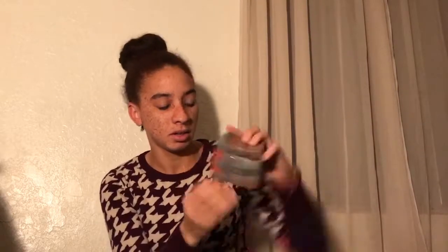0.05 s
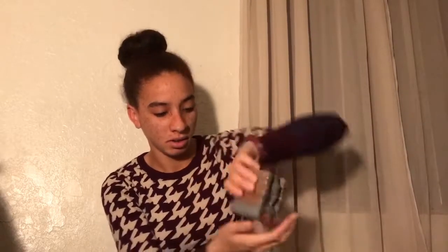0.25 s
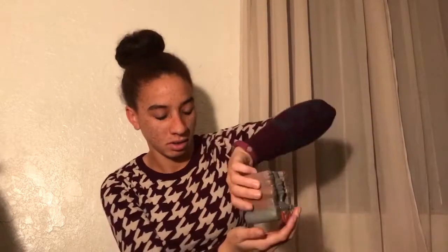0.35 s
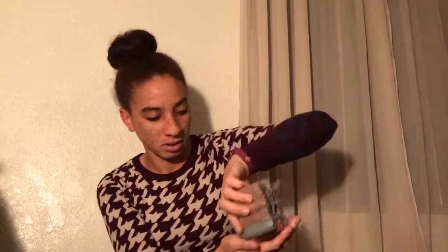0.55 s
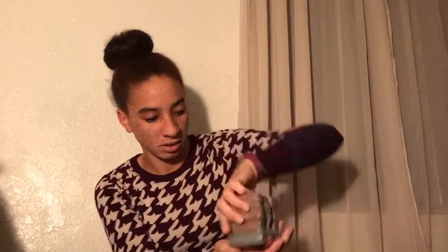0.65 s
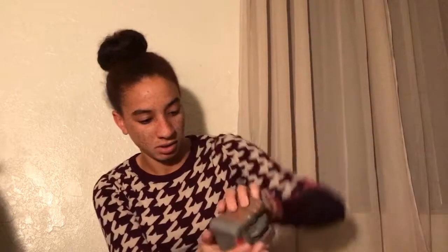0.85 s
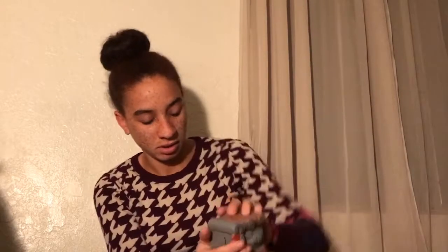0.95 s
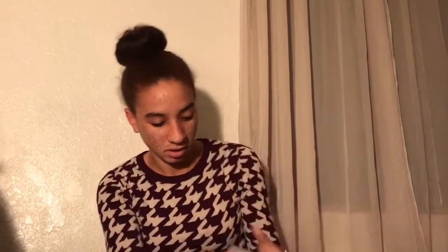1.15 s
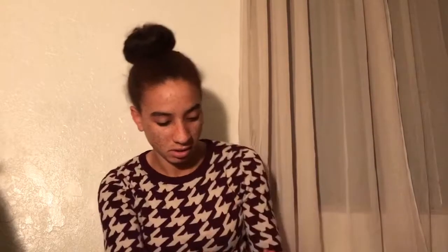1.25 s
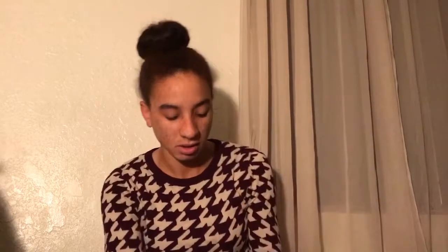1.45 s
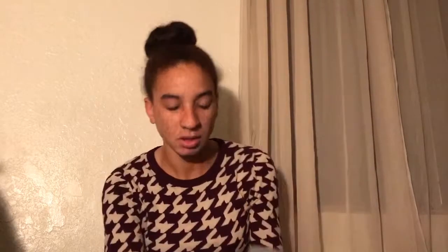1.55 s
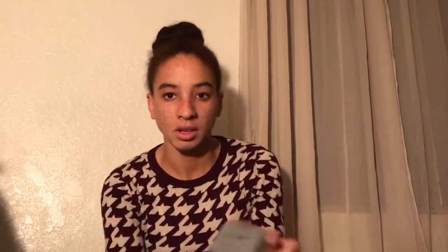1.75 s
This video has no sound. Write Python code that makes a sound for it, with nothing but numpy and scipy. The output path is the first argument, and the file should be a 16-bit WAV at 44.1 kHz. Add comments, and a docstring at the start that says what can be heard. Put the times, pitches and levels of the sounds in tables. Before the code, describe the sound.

A coin tumbles inside a hollow plastic coin bank turned in the hands, with sharp bright clacks first, then weaker clusters of clicks, heard about a metre away in a small furnished room with faint hum.

```python
"""Quiet hum and hiss come first, then a burst of clicks and rattles that comes and goes.
A coin tumbles in a hollow plastic coin bank turned over in the hands, a metre from a laptop microphone.
Each contact clicks, crackles and rings the short modes of the shell; sliding adds faint ticks.
Free coin pings, cavity booms and soft palm knocks join in as decaying tones.
Near surfaces give a few echoes, and filtered noise makes the fast fade of a small furnished room."""
import sys
import numpy as np
from scipy import signal
from scipy.fft import rfft, irfft
from scipy.io import wavfile

SR = 44100
rng = np.random.default_rng(int(sys.argv[2]) if len(sys.argv) > 2 else 0)


def gain_from_decibels(decibels):
    """Convert decibel values to linear amplitude factors."""
    exponent = np.asarray(decibels, float) / 20
    return 10 ** exponent


def dump_mix(stems):
    """Bounce the given channels to the path in sys.argv[1] as a 16-bit WAV at rate SR."""
    frames = np.atleast_2d(stems).T  # one column per channel
    limited = np.clip(frames, -1, 1)  # hard clip at full scale
    pcm = np.round(limited * 32767).astype(np.int16)
    wavfile.write(sys.argv[1], SR, pcm)


N = 79380  # samples, 1.8 s

# Steady background spectrum, before its overall level is set: pitch_hz, level_db
FLOOR_SPECTRUM = [(18, -21.5), (30, -9.5), (45, -5.5), (62, -0.5), (85, -6), (130, -10.5), (270, -14),
                  (900, -21.5), (1500, -21), (2500, -28), (6200, -33), (8800, -32.5), (10500, -31.5),
                  (15600, -28), (16200, -47.5)]
# Early echoes from the nearest surfaces: delay_s, level_db
ECHOES = [(.0078, -16), (.009, -14), (.0102, -14), (.0124, -17)]
# Room tail by pitch: pitch_hz, time_to_fade_60_db_s, level_db
ROOM_TAIL = [(985, 0.2, -8.5), (2170, 0.14, -7), (3480, 0.22, -12.5), (5500, 0.21, -11.5),
             (8650, 0.12, -12.5), (13000, .1, -7)]
# Loudness path of the coin sliding and ticking between contacts: time_s, level_db
SLIDE_LEVELS = [(0, -87), (.09, -74.5), (0.169, -72.5), (.3, -79), (0.501, -72), (.7, -89.5), (.86, -76.5),
                (0.951, -54), (1.03, -82), (1.11, -74.5), (1.2, -103), (1.28, -69), (1.4, -70),
                (1.5, -73.5), (1.6, -64), (1.68, -69), (1.74, -65), (1.8, -58)]
# Soft knocks of the shell against a palm: start_s, level_db
PALM_KNOCKS = [(.234, -47.5), (0.327, -49.5), (1.5417, -46)]
# Shell tones in a palm knock: pitch_hz, level_db, time_to_fade_60_db_s
KNOCK_MODES = [(328, -3, 0.039), (1090, -2, .015)]
# Flat landings that also boom the cavity: start_s, level_db
CAVITY_BOOMS = [(0.126, -56.5), (0.213, -52.5), (0.231, -49), (0.337, -52.5), (0.375, -51.5), (0.404, -47),
                (0.456, -49.5), (0.601, -46.5), (0.921, -52), (0.956, -54), (1.289, -50), (1.62, -57)]
# Cavity tones: pitch_hz, level_db, time_to_fade_60_db_s
CAVITY_MODES = [(882, -2, 0.02076), (1076, -2.5, 0.023), (1297, 0.5, .02)]
# Contacts that leave the coin free to ring until it touches again: start_s, level_db, length_s
COIN_PINGS = [(.2322, -62, .06), (.3204, -56, .016), (.4304, -68, .03), (.6012, -68, .012)]
# Coin tones: pitch_hz, level_db, time_to_fade_60_db_s
COIN_MODES = [(12120, 0, .2), (12740, 4, .15), (14770, -8.5, .1)]
# Shell tones in five groups, low to top: pitch_hz, level_db, time_to_fade_60_db_s
LOW_MODES = [(1742, -19.5, .012), (1994, -10.5, .012), (2162, 1, 0.023), (2352, -1.5, 0.038),
             (2478, -1.5, 0.017)]
BODY_MODES = [(2792, -8.5, 0.012), (3170, -2.5, 0.014), (3233, 0, 0.024), (3330, -12, .01)]
MIDDLE_MODES = [(3710, -3, 0.005), (3904, 0, .012), (4380, 1, .01), (4405, 0, 0.01265), (4767, -12, 0.014)]
HIGH_MODES = [(4722, -8, .01), (5510, 1, 0.014), (6210, -2, 0.013), (6395, -12, 0.01), (6620, -7.5, .008),
              (7095, -1, .008), (7600, -11.5, 0.0044)]
TOP_MODES = [(8500, -0.5, .005), (9010, -5, .005), (10860, -16.5, .004), (12330, -14.5, .005),
             (14200, -17, 0.0037)]
# Unpitched crack of each group, its level set against the tones: low_hz, high_hz, crack_db, decay_s
CRACK_BANDS = [(1720, 3020, -1, 0.0013), (2690, 4180, -5.5, 0.0017), (3800, 4400, -2, 0.00048),
               (5270, 6800, 1, 0.00073), (7700, 10500, -1, 0.00037)]
# Coin contacts: start_s, low_db, body_db, middle_db, high_db, top_db, chatter_ms
CONTACTS = [(0.1139, -70, -71, -70, -60, -67, 1.1), (0.1259, -48, -48, -53, -53, -64, 2.2),
            (0.1912, -84, -71, -72, -66, -79, 1.0), (0.2048, -46, -45, -52, -47, -49, 1.3),
            (0.2144, -27, -21, -26, -18, -25, 1.0), (0.2209, -33, -24, -31, -23, -30, 0.9),
            (0.2269, -55, -45, -44, -41, -53, 1.5), (0.2322, -50, -37, -35, -22, -24, 0.7),
            (0.2923, -58, -51, -52, -60, -61, 1.7), (0.3204, -31, -24, -24, -21, -25, 0.9),
            (0.3382, -44, -34, -36, -35, -42, 2.2), (0.341, -43, -39, -52, -48, -39, 2.2),
            (0.3577, -42, -42, -41, -28, -40, 2.2), (0.3762, -40, -47, -60, -46, -62, 2.2),
            (0.4048, -35, -39, -38, -32, -39, 2.2), (0.4304, -46, -43, -42, -40, -54, 2.1),
            (0.4567, -36, -41, -38, -30, -42, 1.3), (0.4891, -49, -45, -46, -35, -52, 0.8),
            (0.5163, -71, -55, -63, -51, -72, 1.1), (0.6012, -32, -40, -33, -29, -41, 1.0),
            (0.6202, -48, -52, -45, -52, -53, 2.2), (0.6313, -51, -62, -62, -54, -70, 2.2),
            (0.7894, -66, -74, -78, -80, -79, 2.2), (0.8749, -55, -47, -61, -48, -69, 1.3),
            (0.8948, -50, -50, -56, -52, -70, 2.2), (0.9025, -47, -44, -49, -47, -58, 1.4),
            (0.922, -43, -40, -46, -35, -46, 0.9), (0.9503, -62, -43, -54, -47, -51, 1.6),
            (0.9555, -47, -38, -42, -44, -51, 2.2), (0.9829, -55, -57, -64, -66, -80, 1.2),
            (1.0851, -66, -56, -60, -63, -70, 1.3), (1.0965, -73, -64, -68, -78, -71, 2.2),
            (1.2903, -39, -32, -36, -32, -50, 2.2), (1.2969, -43, -54, -38, -34, -37, 1.6),
            (1.3031, -57, -43, -50, -38, -49, 2.2), (1.3093, -56, -38, -34, -31, -51, 1.4),
            (1.3184, -43, -57, -41, -40, -51, 1.6), (1.3722, -55, -57, -59, -64, -69, 1.9),
            (1.392, -53, -57, -54, -58, -68, 2.2), (1.4601, -52, -49, -45, -50, -62, 1.7),
            (1.4695, -51, -64, -64, -69, -76, 2.0), (1.5564, -62, -62, -56, -67, -73, 1.1),
            (1.586, -54, -54, -52, -54, -71, 1.5), (1.5954, -53, -53, -53, -47, -68, 1.0),
            (1.6089, -72, -58, -58, -55, -58, 2.2), (1.6118, -60, -58, -51, -67, -75, 0.7),
            (1.6227, -50, -48, -35, -36, -44, 1.1), (1.6262, -58, -47, -49, -51, -50, 0.7),
            (1.6532, -52, -48, -40, -41, -47, 0.6), (1.6661, -70, -53, -45, -47, -57, 0.9),
            (1.6815, -61, -53, -69, -70, -66, 1.7), (1.7046, -64, -61, -57, -66, -71, 0.9),
            (1.7341, -71, -67, -63, -68, -78, 1.4), (1.7647, -52, -55, -53, -48, -65, 1.2),
            (1.7871, -62, -61, -65, -61, -80, 1.6)]

FLOOR_DB = -66  # average (rms) level of the background
ECHO_SMEAR_S, ECHO_TOP_HZ = 0.00032, 8880
TAIL_START_S, TAIL_SWELL_S = 0.0035, 0.006
TICKS_PER_S, TICK_SPREAD_DB = 760, 2.5
TICK_DAMPING = 0.6  # a sliding coin shortens the shell's rings
MODE_SCATTER_DB = 3.0  # random level change of each shell tone
MODE_DETUNE = 0.018  # random pitch change, as a fraction
CHATTER_DB_AT_1_MS = -8  # chatter against the first click; its gain grows with its length


def unit(x):
    """Scale to unit energy, the sum of the squared samples."""
    return x / np.sqrt(np.sum(x ** 2))


def add(out, x, start_s):
    """Mix x into out from a start time, cutting what runs past the end."""
    i = int(start_s * SR)
    out[i:i + len(x)] += x[:len(out) - i]


def band(lo_hz, hi_hz, order):
    """Make a filter that passes the pitches between two limits."""
    return signal.butter(order, [lo_hz, min(hi_hz, 0.45 * SR)], "band", fs=SR, output="sos")


def floor():
    """Steady room hum and microphone hiss: random noise shaped by a fixed spectrum."""
    freqs = np.fft.rfftfreq(N, 1 / SR)
    hz, db = np.array(FLOOR_SPECTRUM).T
    gain = gain_from_decibels(np.interp(np.log(freqs + 1), np.log(hz), db))
    noise = irfft(rfft(rng.standard_normal(N)) * gain, N)
    return unit(noise) * np.sqrt(N) * gain_from_decibels(FLOOR_DB)


def room(x):
    """Direct sound, a few smeared echoes and a noise tail whose fade time depends on pitch."""
    t = np.arange(SR // 3) / SR
    freqs = np.fft.rfftfreq(len(t), 1 / SR)
    response = np.zeros(len(t))
    for delay_s, db in ECHOES:
        echo = unit(rng.standard_normal(200) * np.exp(-t[:200] / ECHO_SMEAR_S))
        dulled = signal.lfilter(*signal.butter(1, ECHO_TOP_HZ, fs=SR), echo)
        add(response, gain_from_decibels(db) * dulled, delay_s)
    log_hz = np.log(np.array(ROOM_TAIL)[:, 0])
    noise = rfft(rng.standard_normal(len(t)))
    late = np.maximum(t - TAIL_START_S, 0)
    swell = 1 - np.exp(-(late / TAIL_SWELL_S) ** 2)
    for k, (_, t60, db) in enumerate(ROOM_TAIL):
        # Neighbouring pitch bands crossfade into each other
        weight = np.interp(np.log(freqs + 1), log_hz, np.arange(len(log_hz)) == k)
        fade = np.exp(-np.log(1000) * t / t60)
        response += gain_from_decibels(db) * irfft(noise * weight, len(t)) * unit(swell * fade)
    response[0] += 1  # direct sound
    return signal.fftconvolve(x, response)[:N]


def ring(modes, scatter_db, detune, size):
    """One blow makes fading sine tones, with random levels, pitches and signs."""
    hz, db, t60 = np.array(modes).T[:, :, None]
    t = np.arange(size) / SR
    pitch_draw, sign_draw, level_draw = rng.standard_normal((3, len(modes), 1))
    wave = np.sin(2 * np.pi * hz * (1 + detune * pitch_draw) * t)
    fade = np.exp(-np.log(1000) * t / t60)
    gain = np.sign(sign_draw) * gain_from_decibels(db + scatter_db * level_draw)
    return np.sum(gain * wave * fade, axis=0)


def add_sliding(out):
    """A sliding coin gives many tiny random blows, each a damped ring of the shell."""
    for modes in (LOW_MODES, BODY_MODES, MIDDLE_MODES, HIGH_MODES) * 3:
        chance, boost, sign = rng.random(N), rng.exponential(size=N), rng.standard_normal(N)
        happens = chance < TICKS_PER_S / 12 / SR  # the rate is shared by twelve passes
        ticks = happens * gain_from_decibels(TICK_SPREAD_DB * boost) * np.sign(sign)
        ticks = ticks * gain_from_decibels(np.interp(np.arange(N) / SR, *np.array(SLIDE_LEVELS).T))
        damped = np.array(modes) * [1, 1, TICK_DAMPING]
        tick = ring(damped, MODE_SCATTER_DB, 0.05, size=1000)
        tick = signal.sosfilt(band(1400, 9000, order=2), tick)
        out += signal.fftconvolve(ticks, tick)[:N]


def add_booms_and_knocks(out):
    """Flat landings boom the cavity and palm knocks sound the shell, both as low fading tones."""
    for events, modes in ((CAVITY_BOOMS, CAVITY_MODES), (PALM_KNOCKS, KNOCK_MODES)):
        for start_s, db in events:
            tones = ring(modes, 1.2, 0.023, size=3000)
            add(out, gain_from_decibels(db) * signal.sosfilt(band(200, 1600, order=2), tones), start_s)


def add_coin_pings(out):
    """A free coin rings at high pitches until its next touch damps it."""
    t = np.arange(9000) / SR
    for start_s, db, length_s in COIN_PINGS:
        stop = np.exp(-np.maximum(t - length_s, 0) / 0.004)
        ping = gain_from_decibels(db) * stop * ring(COIN_MODES, 0, 0, size=9000)
        add(out, signal.sosfilt(band(9000, 16000, order=2), ping), start_s)


def contact(levels_db, chatter_ms):
    """A click with micro-bounces cracks and rings every group; levels set its first 3 ms."""
    first = int(0.003 * SR)
    t = np.arange(3 * first) / SR
    ms = max(chatter_ms, 0.2)
    # Cubing the noise leaves a few strong bounces among weak ones
    bounces = unit(rng.standard_normal(len(t)) ** 3 * np.exp(-t * 1000 / ms))
    push = gain_from_decibels(CHATTER_DB_AT_1_MS) * ms * bounces
    push[0] += 1  # the first click
    groups = (LOW_MODES, BODY_MODES, MIDDLE_MODES, HIGH_MODES, TOP_MODES)
    out = 0
    for modes, (lo_hz, hi_hz, crack_db, crack_s), db in zip(groups, CRACK_BANDS, levels_db):
        x = unit(ring(modes, MODE_SCATTER_DB, MODE_DETUNE, size=3000))
        burst = rng.standard_normal(len(t)) * np.exp(-t / crack_s)
        crack = signal.sosfilt(band(lo_hz, hi_hz, order=1), burst)
        x[:len(t)] += gain_from_decibels(crack_db) * unit(crack)
        group_band = band(modes[0][0] * 0.87, modes[-1][0] * 1.154, order=3)
        x = signal.sosfilt(group_band, signal.fftconvolve(x, push))
        out = out + x * gain_from_decibels(db) / np.sqrt(2 * np.mean(x[:first] ** 2))
    return out


def bank():
    """The coin bank: contacts with the shell, pings, booms, knocks and sliding ticks, summed."""
    out = np.zeros(N)
    for start_s, *levels_db, chatter_ms in CONTACTS:
        add(out, contact(levels_db, chatter_ms), start_s)
    add_coin_pings(out)
    add_booms_and_knocks(out)
    add_sliding(out)
    return out


def scene():
    """The bank heard in its room, over the steady background, as one channel."""
    return (room(bank()) + floor())[None, :]


def low_pass(x):
    """Removes everything above the highest recorded frequency."""
    return signal.sosfilt(signal.butter(12, 16970, fs=SR, output="sos"), x)


def record(dry):
    """Turn the finished mix into the recorded sound."""
    return low_pass(dry)


dry = scene()
out = record(dry)
dump_mix(out)
```